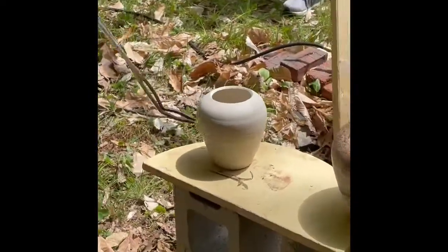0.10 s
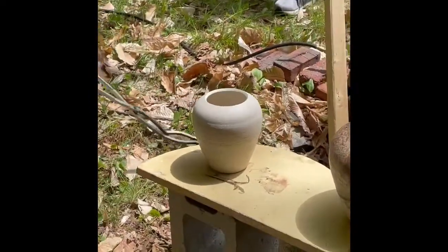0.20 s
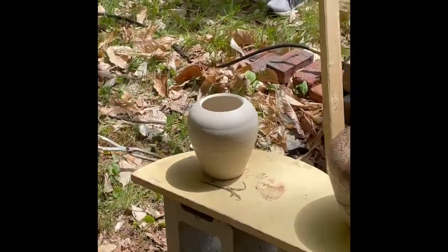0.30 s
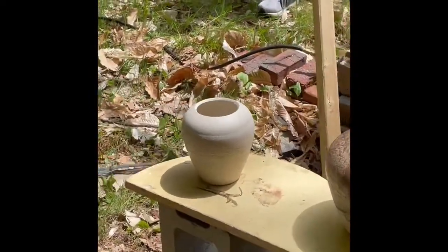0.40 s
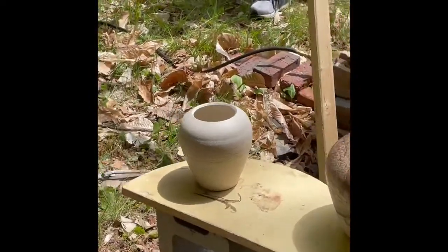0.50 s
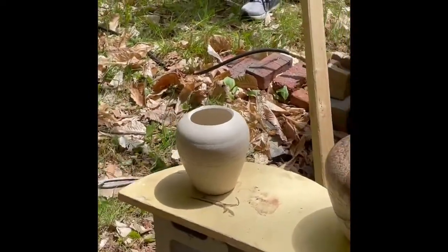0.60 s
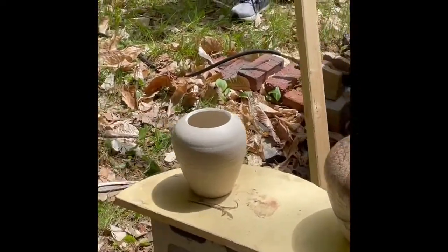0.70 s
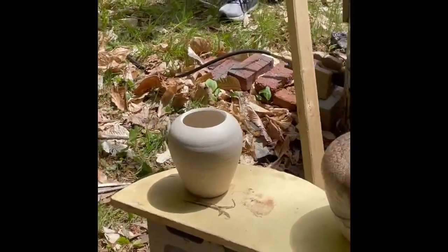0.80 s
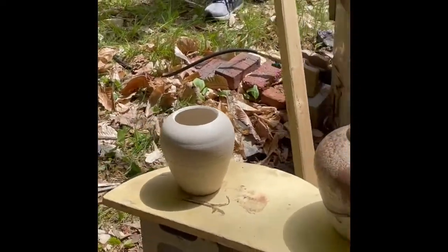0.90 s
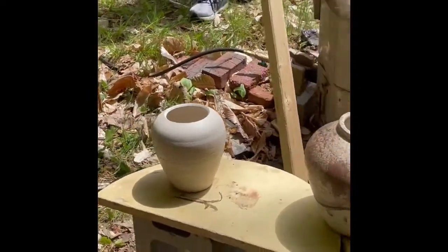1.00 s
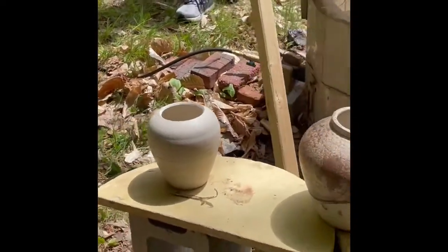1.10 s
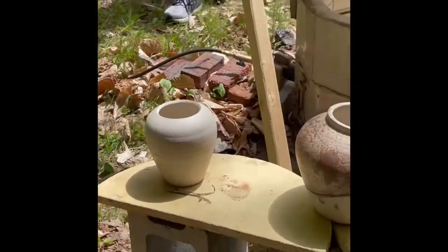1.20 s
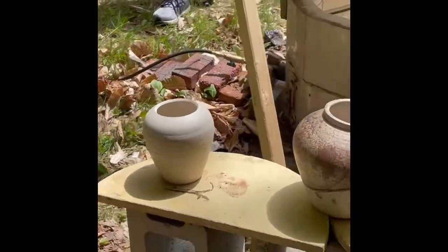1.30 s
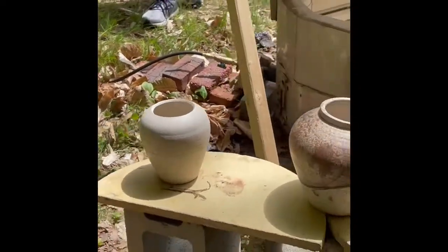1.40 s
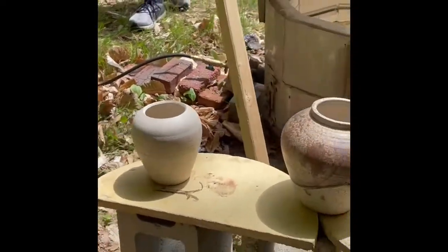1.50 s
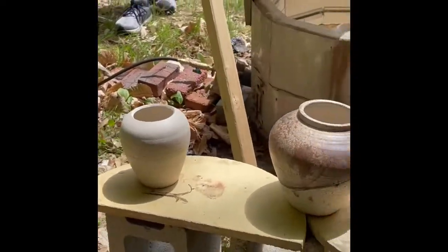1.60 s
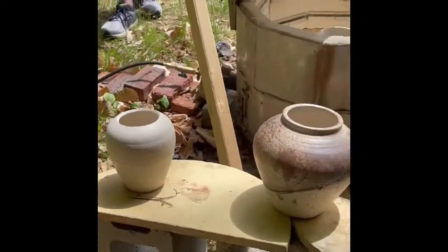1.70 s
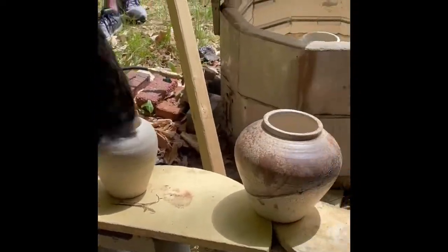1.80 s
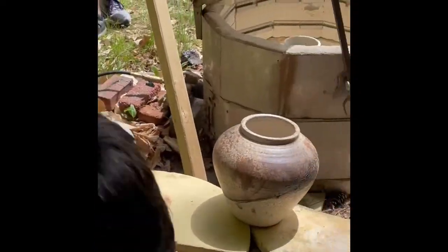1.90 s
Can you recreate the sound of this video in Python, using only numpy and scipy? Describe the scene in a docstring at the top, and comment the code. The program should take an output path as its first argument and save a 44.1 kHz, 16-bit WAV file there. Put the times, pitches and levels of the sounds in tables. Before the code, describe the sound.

Metal tongs clash, scrape and ring as they drop onto soil, then feet rustle dry leaves

```python
"""Outdoors, long metal tongs that have just set a hot clay pot on a kiln shelf are put down among dry leaves.
Their arms clash, scrape and ring as damped modes; the soil thuds as a soft push wakes its low modes.
Feet shuffle through the leaves, whose crackle is shaped noise, random grains and single sharp snaps.
Two hollow knocks stand out among fainter ones, a light metal tink follows, and a low hum wavers far off."""
import sys
import numpy as np
from scipy import signal
from scipy.fft import rfft, irfft, next_fast_len
from scipy.io import wavfile

SR = 44100
rng = np.random.default_rng(int(sys.argv[2]) if len(sys.argv) > 2 else 0)


def master_out(mix):
    """Clip the mix to full scale and print it as 16-bit PCM to the path in sys.argv[1]."""
    frames = np.transpose(np.atleast_2d(mix))
    ceiling = np.clip(frames, -1, 1)
    pcm = np.round(ceiling * 32767).astype(np.int16)
    wavfile.write(sys.argv[1], SR, pcm)


N = 83790
T = np.arange(N) / SR   # time/s

# blows of arm on arm: t/s, relative clash level/dB, relative ring level/dB, place of contact (0-1),
# chatter hold/s, level of the low range relative to the high/dB
STRIKES = [(0.2405, -26.5, -33, 0.8, 0.0086, -9), (0.314, -30.5, -50, .5, .0016, -2),
           (0.3356, -23.5, -38, 0.3, 0.0025, -3), (0.346, -31.5, -39, .3, 0.0056, 10),
           (0.363, -27.5, -49, .4, 0.0012, 0), (0.3855, -10.5, -32.5, 0, 0.0047, 0.5),
           (0.4, -23.5, -41, 0.3, 0.0033, 6.5), (0.416, -35, -47, .1, 0.0018, 4),
           (0.425, -17.5, -27.5, 0.1, 0.0024, -6.5), (.435, -21.5, -33.5, 0.27, 0.0012, -0.5),
           (0.4527, -28.5, -35, 0.1, 0.0025, -2), (0.558, -31, -44, .86, 0.0082, 2.5),
           (0.592, -36, -47, .92, .002, -5), (.606, -24, -29, 0.89, 0.0029, -16),
           (0.624, -40, -38, .9, .003, 9), (0.636, -43, -44, 1, 0.0033, 6)]
# long modes of the tongs: f/Hz, relative level struck at place 0/dB, the same at place 1/dB, t60/s
TONG_MODES = [(1395, -33, -36, .15), (1992, -15, -26, .19), (2126, -19, -30, .17), (2794, -15, -27, .2),
              (3022, -14, -17, .16), (3585, -12, -7, .19), (3828, -28, -15, .16), (4158, -7, -14, .19),
              (4544, -21, -26, .35), (4940, -11, -19, .22), (5057, -12, -12, .18), (5190, -24, -10, .06),
              (5294, -10.5, -3, .29), (5700, -21, -7, .13), (6030, -13, -19, .19), (6550, -22, -14, .25),
              (7241, -7, -17, .19), (7346, -9, -16, .25), (7560, -11, -18, .2), (8570, -13, -22, .13),
              (8790, -10, -6, .2), (9110, -12, -15, .16), (9894, 0, -18, .18), (9985, -13, -6, .19),
              (10700, -19, -11, .15), (11830, -12, -11, .17), (12300, -10, -13, .15),
              (13275, -13, -22, .14)]
# spectrum of metal on metal: f/Hz, relative level/dB
CLASH = [(400, -28), (1100, -24), (3000, -8.5), (4700, -8.5), (5900, 0), (6850, -6.5), (7500, -3),
         (9300, 3.5), (12100, 4), (13000, -16), (14700, -8), (15600, -23)]
WEIGHT_HZ = 4200   # the low range of a blow lies below this frequency


def from_db(db):
    """Level to amplitude: a gain is 10 to the power of dB/20."""
    return 10 ** (np.asarray(db) / 20)


def rms_one(x):
    """Normalisation: scale to unit root-mean-square value."""
    return x / np.sqrt(np.mean(x ** 2) + 1e-20)


def at_hz(points, hz):
    """Interpolation on a logarithmic frequency axis."""
    f, v = np.transpose(points)
    return np.interp(np.log(np.maximum(hz, 1)), np.log(f), v)


def colour(x, spectrum):
    """Minimum-phase filtering: the folded cepstrum gives a causal response; white noise keeps its level."""
    size = 2 * next_fast_len(N)
    hz = np.arange(size // 2 + 1) * SR / size
    gain = rms_one(from_db(at_hz(spectrum, hz)))
    cepstrum = irfft(np.log(gain))
    cepstrum[1:size // 2] *= 2
    cepstrum[size // 2 + 1:] = 0
    response = np.exp(rfft(cepstrum))
    return irfft(rfft(x, size) * response)[:N]


def clicks(times, heights):
    """Impulsive excitation: one single-sample click at each time."""
    return np.bincount((np.asarray(times) * SR).astype(int), heights, N)[:N]


def burst(start, hold, release):
    """Exponential decay: an envelope with instant attack, hold and release."""
    decay = np.exp(-np.clip((T - start - hold) / release, 0, 40))
    return (T >= start) * decay


def grit(per_s):
    """Random impact process: a run of tiny impacts of unit rms."""
    return rms_one(rng.standard_normal(N) * (rng.random(N) < per_s / SR))


def ring(x, hz, t60):
    """Damped oscillator: a two-pole resonator in which a unit click starts a decaying sine of height 1."""
    radius = from_db(-60 / (t60 * SR))
    w = 2 * np.pi * hz / SR
    return signal.lfilter([0, np.sin(w)], [1, -2 * radius * np.cos(w), radius ** 2], x + 1e-18)


def resonance(x, hz, t60):
    """Velocity response: a mode that follows the rate of change of a push adds no deep bass of its own."""
    return np.diff(ring(x, hz, t60), prepend=0) / (2 * np.sin(np.pi * hz / SR))


def body(x, modes):
    """Modal superposition: the sound of an object is the sum of its modes."""
    return sum(from_db(db) * ring(x, hz, t60) for hz, db, t60 in modes)


def mode_db(db0, db1, place):
    """Modal coupling: the place of contact sets how strongly a mode is woken."""
    return db0 + place * (db1 - db0)


def tongs():
    """Modal excitation by impact: each clash is a brief chatter that wakes many short and a few long modes."""
    crack_db, clang_db, ring_trim_db = -3, -2, 2
    crowd_db, crowd_t60_s = -4, 0.12
    s, clash_db, ring_db, place, _, weight_db = np.transpose(STRIKES)
    out = from_db(crack_db) * colour(chatter(), CLASH)
    out += from_db(clang_db) * clang(chatter())

    # a crowd of short modes, nearly evenly spaced, woken with random strength and sign
    pitches = np.linspace(1200, 15500, 320) + rng.uniform(-22, 22, 320)
    gains = from_db(at_hz(CLASH, pitches))
    gains *= from_db(crowd_db) / np.sqrt(np.sum(gains ** 2) / 2)
    strengths = rng.standard_normal((len(s), len(pitches)))
    for hz, gain, strength in zip(pitches, gains, strengths.T):
        heights = from_db(clash_db + weight_db * (hz < WEIGHT_HZ)) * strength
        out += gain * ring(clicks(s, heights), hz, crowd_t60_s)

    # long modes, neighbours starting with opposite sign
    for k, (hz, db0, db1, t60) in enumerate(TONG_MODES):
        heights = from_db(ring_trim_db + ring_db + mode_db(db0, db1, place))
        out += ring((-1) ** k * clicks(s, heights), hz, t60)
    return out


def chatter():
    """Repeated micro-impact: steel rattles briefly on steel, each blow with its own share of the low range."""
    attack_s, release_s, grains_per_s = 0.001, 0.003, 6000
    high_level = low_level = 0
    for s, db, _, _, hold, weight_db in STRIKES:
        attack = np.clip((T - s) / attack_s, 0, 1)
        level = from_db(db) * burst(s, hold, release_s) * attack
        high_level = high_level + level
        low_level = low_level + from_db(weight_db) * level
    out = 0
    for kind, level in (("high", high_level), ("low", low_level)):
        band = signal.butter(3, WEIGHT_HZ, kind, fs=SR, output="sos")
        out = out + signal.sosfilt(band, level * grit(grains_per_s))
    return out


def clang(drive):
    """Forced resonance: the chatter drives broad, strongly damped modes, normalised for their joint power."""
    # broad resonances: f/Hz, relative level/dB
    clang_modes = [(1426, -11), (2395, -17), (2900, -16), (3520, -12), (4150, -12), (4742, -13), (5717, -5),
                   (5991, -9), (6600, -12), (7197, -3), (7520, -1), (7700, 1), (8800, -1), (9097, -5),
                   (10206, -3), (10723, -2), (10992, -6), (11650, 0), (12225, -4), (13022, -16),
                   (13436, -17), (13969, -14), (14744, -12)]
    t60_s = 0.029
    total = sum(from_db(db) * resonance(drive, hz, t60_s) for hz, db in clang_modes)
    power = sum(from_db(db) ** 2 for _, db in clang_modes) * t60_s * SR / (4 * np.log(1000))
    return total / np.sqrt(power)


def scrapes():
    """Stick-slip friction: tiny slips of arm on arm keep damped modes rattling."""
    # slides: t/s, hold/s, level of the rattle/dB, place of contact (0-1)
    slides = [(.248, .012, -40, 1), (.392, .022, -34, .2), (.428, .032, -38, .1), (.568, .025, -45, 1),
              (.612, .034, -40, 1)]
    rise_s, release_s, t60_s = .003, .015, .06
    slips_per_s, grit_db, top_hz = 1500, -6, 7600
    softening = signal.butter(2, top_hz, fs=SR, output="sos")
    out = 0
    for s, length, db, place in slides:
        slips = signal.sosfilt(softening, grit(slips_per_s))
        rattle = sum(from_db(mode_db(db0, db1, place)) * ring(slips, hz, t60_s)
                     for hz, db0, db1, _ in TONG_MODES)
        sound = rms_one(rattle) + from_db(grit_db) * rms_one(colour(slips, CLASH))
        rise = np.clip((T - s) / rise_s, 0, 1)
        out = out + from_db(db) * burst(s, length, release_s) * rise * sound
    return out


def landings():
    """Contact-time low-pass: a soft push wakes mainly low modes of soil and arms, while the litter crunches."""
    # contacts with the soil: t/s, relative thud level/dB, crunch level/dB, push time constant/s,
    # frequency ratio of the soil modes
    contacts = [(0.2443, -25, -49, .0016, 1.44), (.258, -31, -54, 0.0014, 1.3),
                (.3428, -22, -22.5, 0.0003, 0.99), (.348, -21.5, -38, 0.00088, 1.094),
                (0.3606, -19.5, -36, 0.00096, 0.94), (0.37, -28.5, -43, 0.0011, .95),
                (.388, -38.5, -37, .00027, .94), (.402, -31.5, -36, 0.0011, 1.11),
                (0.423, -36, -56, 0.0014, 0.98), (0.438, -38, -54, 0.002, 0.99),
                (.606, -47, -56, .0008, 1.3)]
    # soil: f/Hz before the ratio, relative level/dB, t60/s
    soil_modes = [(89, 3.5, 0.059), (137, -3.5, 0.06), (181, -2.5, 0.072), (353.4, -1.5, 0.068),
                  (470, -6, 0.028)]
    # wobble of the long arms: f/Hz, relative level/dB, t60/s
    flex_modes = [(102.6, -18, 0.47), (138.9, -12.5, 0.32), (289.3, -12.5, 0.2)]
    # crunch spectrum: f/Hz, relative level/dB
    crunch_spectrum = [(100, 4.5), (440, 3.5), (690, -10.5), (820, -2.5), (1200, -2), (1800, -5.5),
                       (3000, -2), (8000, -16.5)]
    lead_s, release_s = .0048, 0.009   # the crunch starts ahead of the thud
    out, crush = 0, 0
    for s, thud_db, crunch_db, length, ratio in contacts:
        age = np.maximum(T - s, 0) / length
        push = from_db(thud_db) * age * burst(s, 0, length) / (length * SR)
        modes = [(hz * ratio, db, t60) for hz, db, t60 in soil_modes] + list(flex_modes)
        out = out + sum(from_db(db) * resonance(push, hz, t60) for hz, db, t60 in modes)
        crush = crush + from_db(crunch_db) * burst(s - lead_s, 0, release_s)
    return out + colour(crush * rng.standard_normal(N), crunch_spectrum)


def knocks():
    """Impact and friction: a scuff of the sole swells into each hollow modal knock underfoot and dies away."""
    # knocks: t/s, relative level/dB, frequency ratio, scuff level/dB, scuff fall time constant/s
    blows = [(.5425, -29, 1.023, -36, 0.0091), (.586, -43, 0.88, -44, 0.045),
             (.638, -46, 0.62, -49.5, 0.024), (.957, -42.5, 1, -41.5, 0.005),
             (1.0287, -31.5, 0.992, -42.5, 0.016), (1.066, -42, 0.73, -54, 0.02)]
    # hollow modes: f/Hz before the ratio, relative level/dB, t60/s
    hollow_modes = [(125, -21, .16), (240, -13, 0.13), (293, -12, 0.13), (381, -14.5, 0.093),
                    (522, -4, 0.072), (565, -1, 0.059), (686, -5, 0.07)]
    # scuff spectrum: f/Hz, relative level/dB
    scuff_spectrum = [(80, -11), (280, -1), (600, -5.5), (900, -20), (1500, -10), (4000, -30)]
    rise_s = 0.012
    out, rub = 0, 0
    for s, db, ratio, rub_db, fall in blows:
        modes = [(hz * ratio, level, t60) for hz, level, t60 in hollow_modes]
        out = out + body(clicks([s], [from_db(db)]), modes)
        rub = rub + from_db(rub_db) * np.exp(-np.maximum((s - T) / rise_s, (T - s) / fall))
    return out + colour(rub * rng.standard_normal(N), scuff_spectrum)


def tink():
    """Free vibration: one light metal touch rings, its modes starting up to 1.4 ms apart."""
    # metal modes: f/Hz, relative level/dB, t60/s
    metal_modes = [(3770, -7, 0.096), (6000, -5.5, 0.1), (6800, -3, 0.075), (8100, -9, .1),
                   (8780, 3, 0.053), (12130, 6, 0.054), (12800, -5, 0.063), (15000, -12, .06)]
    touch_s, touch_db = 1.4195, -32.5
    out = 0
    for hz, db, t60 in metal_modes:
        touch = clicks([touch_s + rng.uniform(0, 0.0014)], [1])
        out = out + from_db(touch_db + db) * ring(touch, hz, t60)
    return out


def snaps():
    """Brittle fracture: each leaf or twig gives a sharp click and a little crumbling in its own band."""
    # fractures: t/s, peak level/dB, band centre f/Hz
    fractures = [(0.7996, -24.5, 3180), (.8068, -22, 9400), (.814, -22, 7000), (.844, -29, 9000),
                 (.871, -21.5, 5000), (.888, -25, 1960), (0.9331, -16.5, 8000), (.9425, -21.5, 4930),
                 (0.9573, -22, 6130), (1.0804, -24.5, 3200), (1.1955, -19.5, 2230), (1.1963, -27.5, 1160),
                 (1.2012, -30, 3200), (1.2125, -17, 9000), (1.2238, -11, 7600), (1.2281, -23, 3200),
                 (1.228, -30, 1000), (1.29, -32, 2500), (1.3255, -21, 8060), (1.335, -22, 8300),
                 (1.591, -27, 4240), (1.669, -31, 4500), (1.7948, -37.5, 1140), (1.878, -33, 2960),
                 (1.89, -38, 1780)]
    release_s, width, crumble = .0007, 1.54, 0.19   # width: ratio of band edge to centre
    out = np.zeros(N)
    for s, db, hz in fractures:
        band = signal.butter(2, [hz / width, hz * width], "band", fs=SR, output="sos")
        crumbling = crumble * burst(s, 0, release_s) * rng.standard_normal(N)
        crack = signal.sosfilt(band, clicks([s], [1]) + crumbling)
        out += from_db(db) * crack / np.abs(crack).max()
    return out


def leaves():
    """Granular noise: countless tiny cracks over a smooth rub, in a low crush and a high hiss."""
    # rustle under the feet: t/s, low crush level before trim/dB, high hiss level before trim/dB
    rustle = [(0, -50.5, -45.5), (0.065, -51.5, -47.5), (0.088, -44.5, -38.5), (0.16, -47.5, -41.5),
              (0.19, -50.5, -45.5), (0.235, -47.5, -42.5), (0.3, -44, -36.5), (.36, -43, -37),
              (.44, -56, -45), (0.51, -52.5, -45), (0.589, -47, -44.5), (0.7, -49, -42),
              (0.77, -47.5, -45.5), (0.81, -43.5, -38.5), (0.89, -43, -38), (0.93, -45.5, -43),
              (0.98, -50.5, -46.5), (1.01, -53, -46), (1.07, -44.5, -40), (1.14, -46.5, -44.5),
              (1.19, -43.5, -36.5), (1.25, -45.5, -41), (1.35, -43, -35.5), (1.38, -48.5, -39),
              (1.46, -50, -43), (1.59, -42, -38), (1.68, -45, -44.5), (1.761, -59.5, -56),
              (1.84, -56.5, -50.5), (1.885, -49.5, -51)]
    # leaf spectrum: f/Hz, relative level/dB
    leaf_spectrum = [(130, -6.5), (250, -9), (600, -3.5), (1500, -4.5), (3000, -4), (5500, -5), (7400, -1),
                     (9500, 0), (12200, 0.5), (13300, -13), (15700, -17)]
    crush_trim_db, hiss_trim_db, split_hz = 1, 0.5, 5410
    grains_per_s, spread_db, grain_share = 2500, 5, 0.5   # share of the power in grains
    s, crush_db, hiss_db = np.transpose(rustle)
    out = 0
    for kind, level_db in (("low", crush_db + crush_trim_db), ("high", hiss_db + hiss_trim_db)):
        sizes = from_db(spread_db * np.minimum(rng.exponential(1, N), 4)) * rng.choice([-1, 1], N)
        grains = rms_one(sizes * (rng.random(N) < grains_per_s / SR))
        rub = rng.standard_normal(N)
        sound = colour(np.sqrt(grain_share) * grains + np.sqrt(1 - grain_share) * rub, leaf_spectrum)
        band = signal.butter(3, split_hz, kind, fs=SR, output="sos")
        out = out + rms_one(signal.sosfilt(band, sound)) * from_db(np.interp(T, s, level_db))
    return out


def background():
    """Steady noise and amplitude modulation: still outdoor air and a distant, slightly wavering pure hum."""
    # air spectrum: f/Hz, relative level/dB
    air_spectrum = [(25, -31), (70, 5), (150, -8), (400, -9.5), (1500, -16.5), (6000, -21), (15000, -26)]
    # hum before the waver: t/s, rms level/dB
    hum_level = [(.04, -60.5), (.14, -74), (.3, -68), (.6, -61.5), (1.8, -58), (1.86, -71)]
    air_db, hum_hz, waver_db = -64, 71.5, 2.5
    waver = np.interp(T, np.linspace(0, T[-1], 20), rng.standard_normal(20))
    level_db = np.interp(T, *np.transpose(hum_level)) + waver_db * waver
    hum = np.sqrt(2) * from_db(level_db) * np.sin(2 * np.pi * hum_hz * T)
    return hum + from_db(air_db) * colour(rng.standard_normal(N), air_spectrum)


def scattered(x):
    """Diffuse reflection: convolution with decaying noise makes a brief wash from the ground and the kiln."""
    echoes = burst(0, 0, 0.0024) * rng.standard_normal(N)
    return signal.fftconvolve(x, echoes / np.sqrt(np.sum(echoes ** 2)))[:N]


def ports(direct, diffuse):
    """Interchannel phase and decorrelation: two ports share dephased direct sound; diffuse sound differs."""
    # phase between the ports: f/Hz, lead of the left/rad
    port_phase = [(300, 0), (750, .75), (1450, 0), (4000, .05), (4800, 1.4), (5100, 0), (5950, .2),
                  (7000, 1.15), (9000, 2.9), (10900, 3.3), (12700, 4.4), (13900, 6.28)]
    # gain of the diffuse sound: f/Hz, level/dB
    scatter_gain = [(150, -34), (600, -13), (1200, -11), (2200, -22), (4000, -16), (4800, -9), (5400, -20),
                    (6500, -10), (8000, -10), (10000, -24), (13000, -7), (14300, -24)]
    size = 2 * next_fast_len(N)
    hz = np.arange(size // 2 + 1) * SR / size
    mid = rfft(direct, size)
    side = rfft(diffuse, size) * from_db(at_hz(scatter_gain, hz))
    turn = np.exp(.5j * at_hz(port_phase, hz))   # half the phase to each port
    left = irfft((mid + side) * turn)[:N]
    right = irfft((mid - side) / turn)[:N]
    return np.array([left, right])


def scene():
    """Superposition: the contacts sound close by; leaves rustle both in front and all around."""
    contacts = tongs() + scrapes() + landings() + knocks() + tink() + snaps()
    return ports(contacts + leaves() + background(), scattered(contacts) + leaves())


def record(dry):
    """Band limiting and soft saturation: deep bass is rolled off, peaks are rounded and the top is cut."""
    low_cut_hz, top_cut_hz = 57, 15700
    low_cut = signal.butter(4, low_cut_hz, "high", fs=SR, output="sos")
    top_cut = signal.ellip(10, .2, 80, top_cut_hz, fs=SR, output="sos")
    rounded = np.tanh(signal.sosfilt(low_cut, dry))
    return signal.sosfilt(top_cut, rounded)


dry = scene()
out = record(dry)
master_out(out)
```